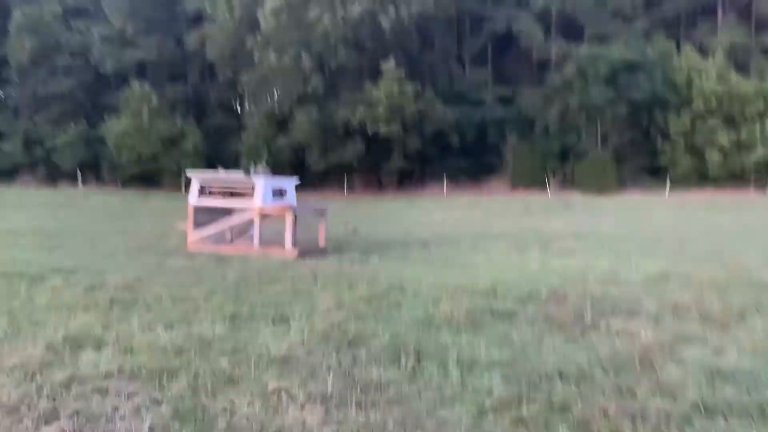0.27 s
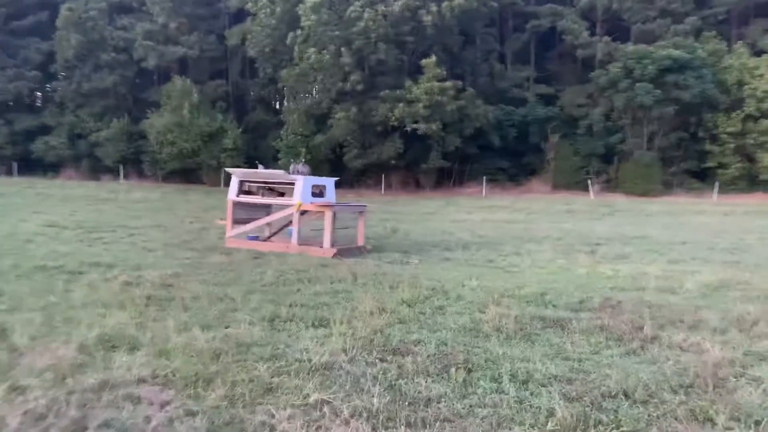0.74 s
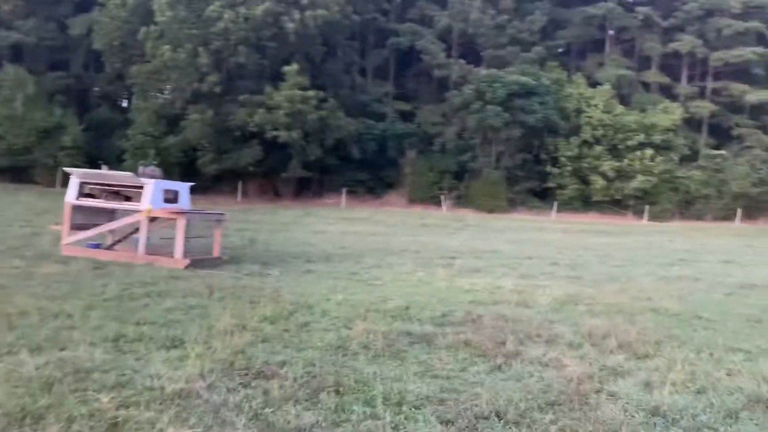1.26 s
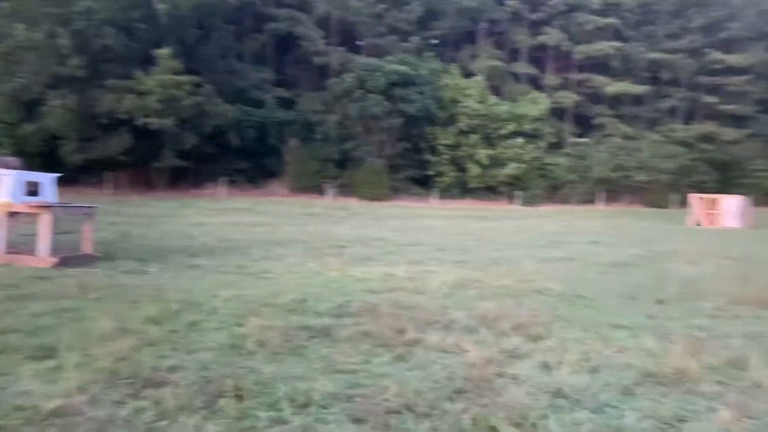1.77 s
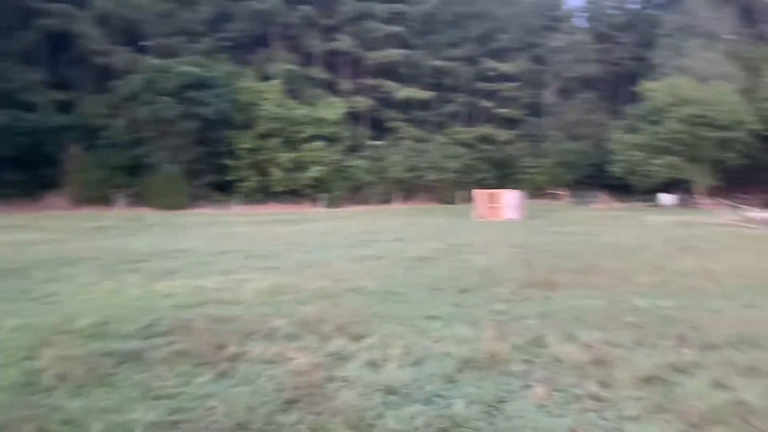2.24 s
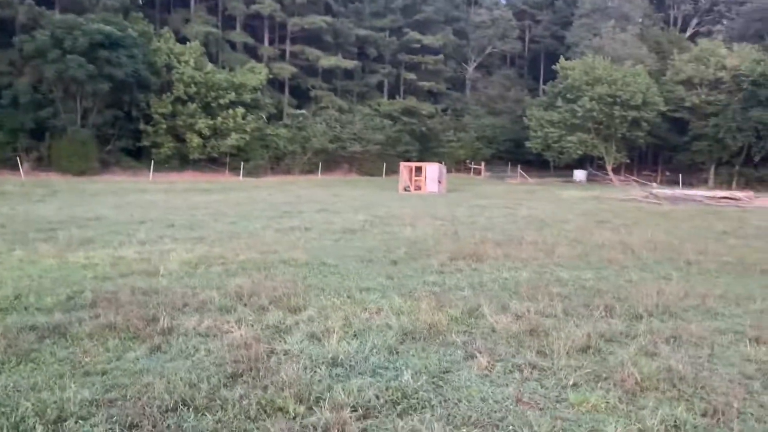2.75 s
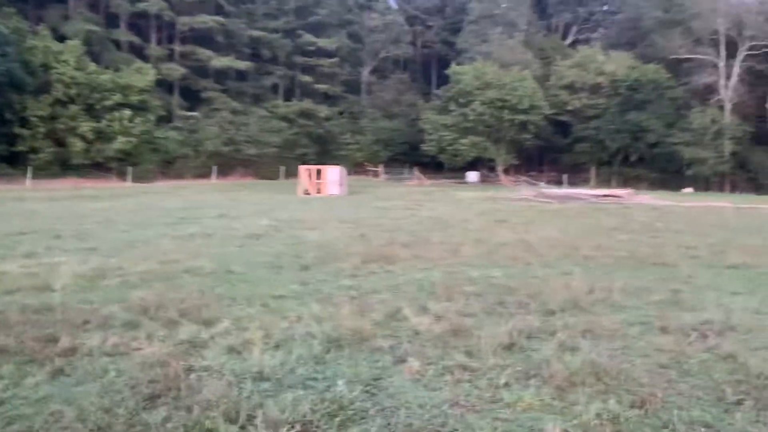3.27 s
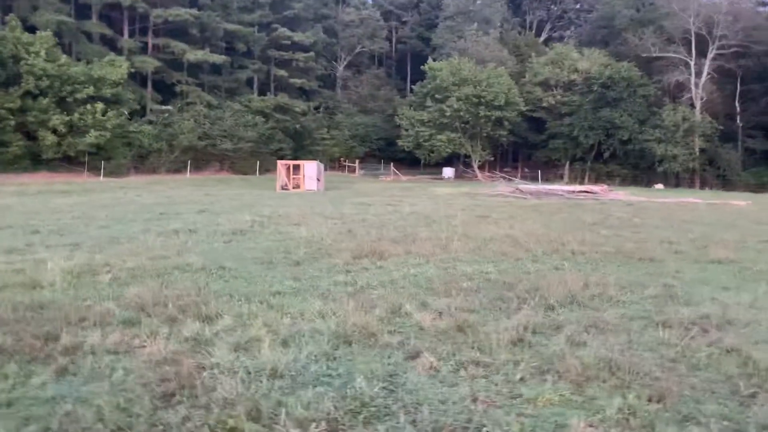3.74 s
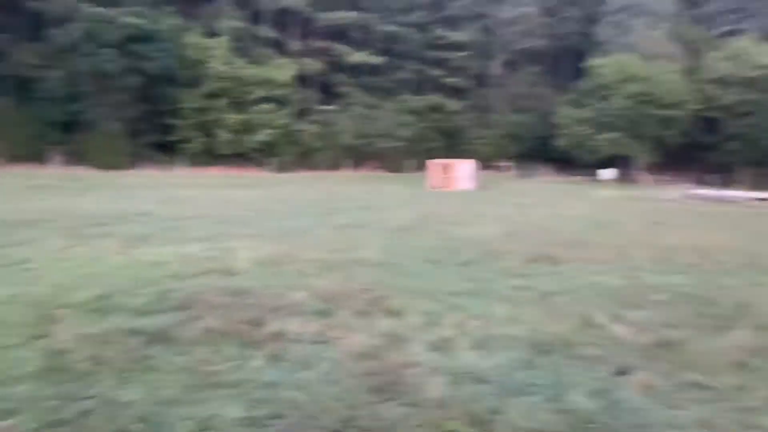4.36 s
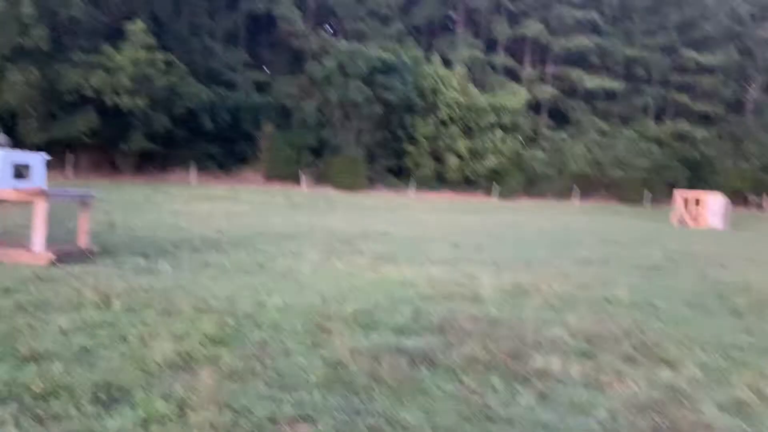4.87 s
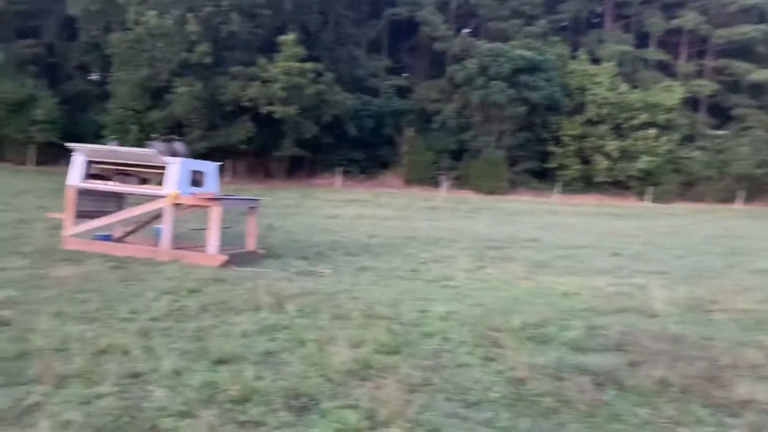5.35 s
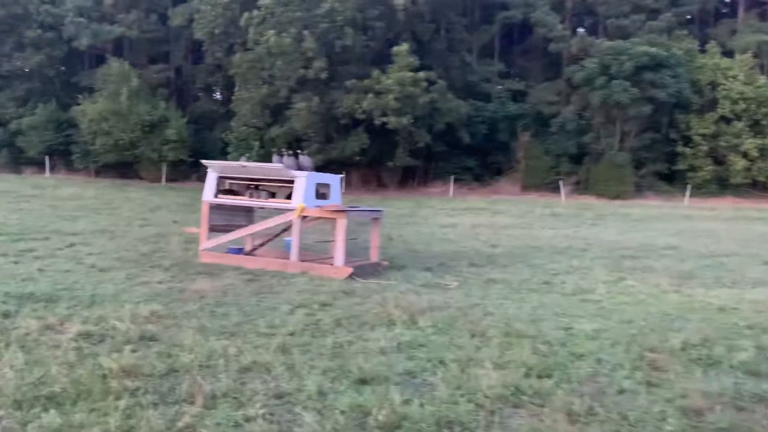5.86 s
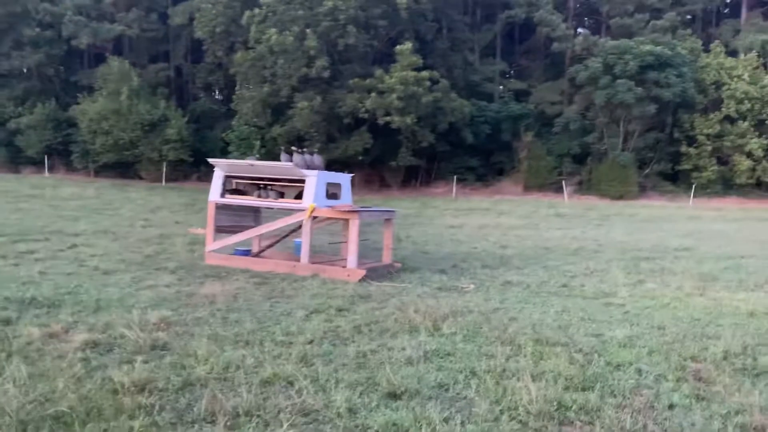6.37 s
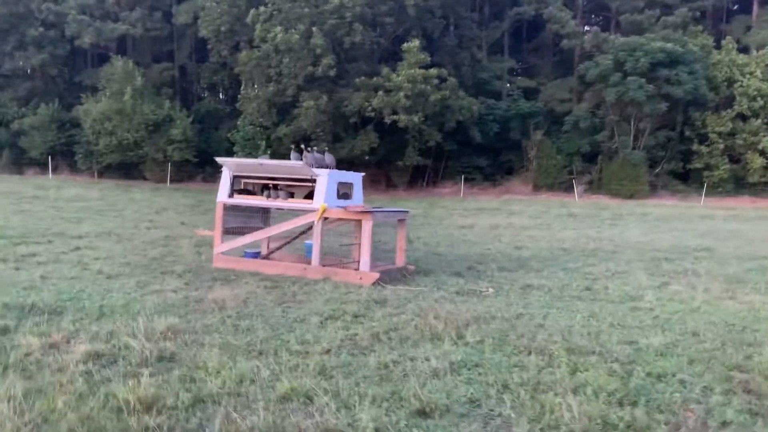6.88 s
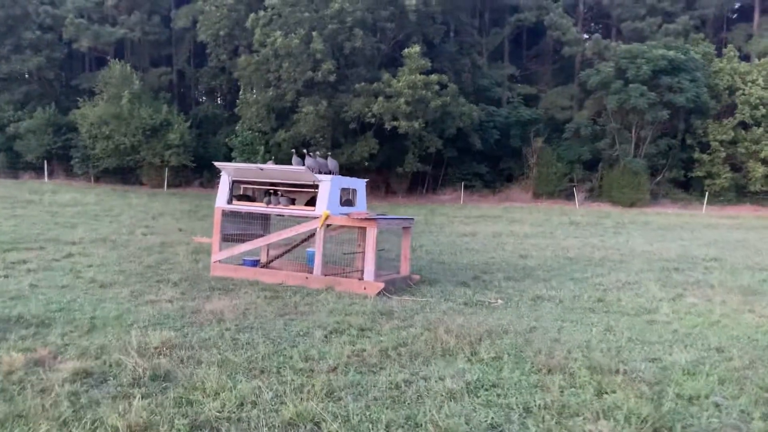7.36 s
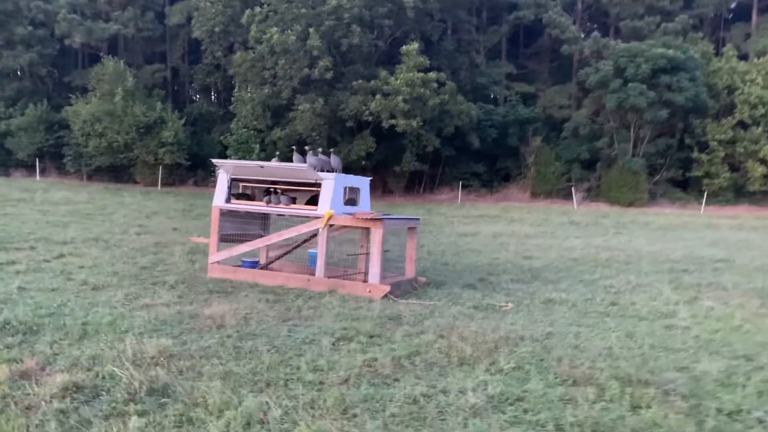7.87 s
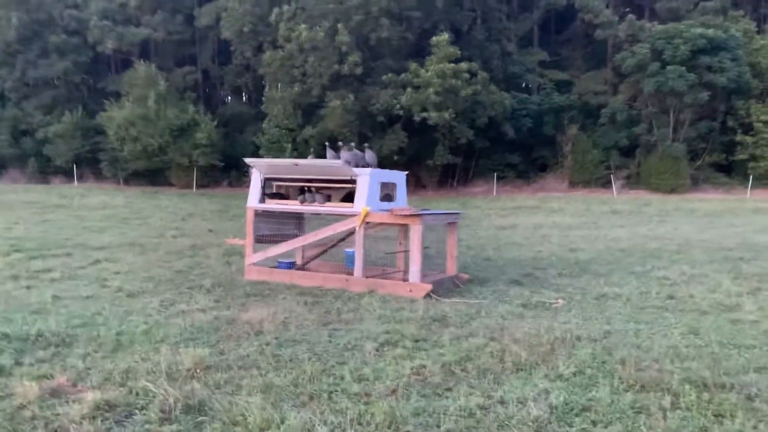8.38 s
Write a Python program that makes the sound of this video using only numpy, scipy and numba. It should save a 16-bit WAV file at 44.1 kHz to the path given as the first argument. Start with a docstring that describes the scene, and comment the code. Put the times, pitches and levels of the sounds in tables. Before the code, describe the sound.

Outdoors on a pasture beside woods, guinea fowl on a coop call in a steady rhythm: short cluck, then a longer rasping cry, roughly every 0.7 seconds. Clear piercing notes overlap the hoarse ones. The calls grow louder and closer toward the end. A handheld phone picks up grassy footsteps, a few stalk snaps, insect hiss and low rumble, with a faint echo from the trees.

```python
"""Guinea fowl on the roof of a coop call over a pasture: a short two-note cluck, then a long harsh cry, repeated.
Hoarse and clear voices overlap; each is a buzzing pulse train shaped by resonances of beak and throat.
Someone walks through the grass with a phone: steps are swells of crackling noise, snaps are noise bursts.
Filtered noise makes the air and the insects' hiss, a sine a far motor's hum; sines that glide make small
clicks, a soft coo and a faint warble."""
import sys
import numpy as np
from scipy import signal
from scipy.fft import rfft, irfft, next_fast_len
from scipy.io import wavfile
from scipy.ndimage import uniform_filter1d, map_coordinates
from numba import njit

SR = 44100
rng = np.random.default_rng(int(sys.argv[2]) if len(sys.argv) > 2 else 0)


def to_wav(sig):
    """Store sig (one row per channel, or 1-D mono) as 16-bit WAV at the path in sys.argv[1].

    Samples outside -1..1 are clipped; the rate is SR.
    """
    pcm = np.clip(np.atleast_2d(sig), -1, 1) * 32767
    pcm = np.round(pcm).astype(np.int16)
    wavfile.write(sys.argv[1], SR, pcm.T)  # frames by channels


N = 380141

# The grass's rustle, which the crunch of the steps follows.
# Each row: time in seconds, level in dB.
RUSTLE_LEVEL = [(.3, -63), (4.5, -61.5), (5.5, -58)]
ATTACK_S = .008  # every bird note starts abruptly


def undb(db):
    """Decibels to gain."""
    return 10 ** (np.asarray(db) / 20)


def unit(x):
    """Scale to rms 1."""
    return x / np.sqrt(np.mean(x ** 2))


def steady(x, size=1100):
    """Hold the running rms at 1 over a window of size samples."""
    return x / np.sqrt(uniform_filter1d(x * x, size) + 1e-12)


def along(x, points):
    """Read a curve of (position, value) points at x."""
    return np.interp(x, *np.transpose(points))


def bump(t, centre_s, width_s):
    """A smooth bell-shaped swell that peaks at 1."""
    return np.exp(-.5 * ((t - centre_s) / width_s) ** 2)


def sine(hz):
    """A sine that follows a moving frequency."""
    return np.sin(2 * np.pi * np.cumsum(hz) / SR)


def walk(n, rate):
    """Smooth chance: straight lines between normal draws, rate new values a second."""
    at = np.arange(n) * rate / SR
    knots = np.arange(int(at[-1]) + 2)
    return np.interp(at, knots, rng.standard_normal(len(knots)))


def colour(x, points):
    """Filter by a spectrum of (Hz, dB) points."""
    hz, db = np.transpose(points)
    n = x.shape[-1]
    size = next_fast_len(n)
    bin_hz = np.arange(size // 2 + 1) * SR / size
    gain = undb(np.interp(np.log(bin_hz + 1), np.log(hz), db))
    return irfft(rfft(x, size) * gain, size)[..., :n]


@njit
def svf(x, hz, width):
    """Band-pass with a moving centre, gain 1 there."""
    y, band, low = np.empty(len(x)), 0., 0.
    for i in range(len(x)):
        g, k = np.tan(np.pi * hz[i] / SR), width[i] / hz[i]
        v = (band + g * (x[i] - low)) / (1 + g * (g + k))
        band, low, y[i] = 2 * v - band, low + 2 * g * v, k * v
    return y


def resonance(x, hz, width_hz):
    """A resonance with steep skirts: two equal band-passes in a row."""
    hz, width = hz + np.zeros(len(x)), width_hz + np.zeros(len(x))
    return svf(svf(x, hz, width), hz, width)


def add(out, s, x):
    """Mix x in at time s."""
    i = max(int(s * SR), 0)
    out[i:i + len(x)] += x[:N - i]


def open_air():
    """Low rumble nearly alike in both ports and insect hiss from all round, both coloured noise."""
    # Spectrum of the open air's rumble and the insects' hiss.
    # Each row: frequency in Hz, relative density in dB.
    air_spectrum = [(22, -42), (42, -5), (78, 4.5), (170, -7.5), (480, -18.5), (1400, -17), (2200, -9),
                    (3000, -9), (4400, -8.5), (5700, -14), (6800, -7), (7500, -24), (9500, -38.5)]
    # Gain of the low rumble. Each row: time in seconds, gain in dB.
    rumble_gain = [(.8, 0.5), (3.7, 5), (4.7, 2.5)]
    mid = colour(rng.standard_normal(N), air_spectrum)
    side = colour(rng.standard_normal(N), air_spectrum)
    side = colour(side, [(130, -13), (500, 0), (1500, 0.5)])
    air = undb(-45.0) * unit(np.array([mid + side, mid - side]))
    rumble = colour(air, [(200, 1.5), (450, -58)])
    extra = undb(along(np.arange(N) / SR, rumble_gain)) - 1  # the air already holds the rumble once
    return air + rumble * extra


def insect_chorus():
    """One chorus, a narrow band of noise, swells while the phone faces it."""
    t = np.arange(N) / SR
    chorus = np.array([unit(resonance(rng.standard_normal(N), 2990, width_hz=400)) for _ in range(2)])
    return chorus * undb(-49.5) * bump(t, 3.35, 1.5)


def motor_hum():
    """A far motor: a sine at 120 Hz whose level and phase waver."""
    t = np.arange(N) / SR
    return undb(-54.5 + 2 * walk(N, 4.0)) * np.sin(2 * np.pi * 120 * t + .5 * walk(N, 15.0))


def rustle(uneven_db=3):
    """The grass rustles unevenly: a broad band of noise with slow and quick wavers in level."""
    level_db = along(np.arange(N) / SR, RUSTLE_LEVEL)
    level_db = level_db + uneven_db * (walk(N, 9.6) + walk(N, 45))
    return undb(level_db) * unit(resonance(rng.standard_normal(N), 785, width_hz=1440))


def warble(s=7.9, length=0.38, hz=2480, db=-52, swing_hz=120, rate_hz=14):
    """A faint, thin whistle far off: a sine whose pitch swings up and down."""
    out, t = np.zeros(N), np.arange(int(length * SR)) / SR
    swing = np.sin(2 * np.pi * rate_hz * t)
    size = undb(db + 2 * walk(len(t), 36)) * np.sqrt(np.hanning(len(t)))
    add(out, s, size * sine(hz + swing_hz * swing))
    return out


def coo(s=3.188, length=0.097, hz=298, db=-42):
    """One soft, pure, low note that arches slightly."""
    out, u = np.zeros(N), np.linspace(0, 1, int(length * SR))
    arch = np.sin(np.pi * u).clip(0)
    add(out, s, undb(db) * np.sqrt(arch) * sine(hz + 20 * (arch - .5)))
    return out


def hisses(half_s=0.033, hz=11300, width_hz=3200):
    """Short swells of very high noise."""
    # Brief high hisses. Each row: centre in seconds, peak level in dB.
    hiss_rows = [(2.11, -45), (2.95, -53), (5.61, -47.5), (6.92, -52.5)]
    t = np.arange(N) / SR
    swell = sum(undb(db) * bump(t, s, half_s) for s, db in hiss_rows)
    return swell * unit(np.array([resonance(rng.standard_normal(N), hz, width_hz) for _ in range(2)]))


def clicks(ring_s=0.0017):
    """Small wet clicks: a few cycles of a sine that fall quickly in pitch."""
    # Small wet clicks. Each row: start in seconds, level of the sine before it dies away in dB.
    click_rows = [(2.712, -24), (5.541, -30), (6.894, -27.5)]
    out, t = np.zeros(N), np.arange(SR // 50) / SR
    hz = 750 + 2200 * np.exp(-t / 0.00045)
    for s, db in click_rows:
        add(out, s, undb(db) * sine(hz) * bump(t, 0, ring_s))
    return out


def snaps(decay_s=0.0027, spread=0.99, bright_db=-24):
    """Stalks break underfoot: a few milliseconds of crackle each, pitched by the stalk's thickness."""
    # Dry stalks that snap. Each row: start in seconds, level in dB, centre in Hz.
    snap_rows = [(0.267, -38.5, 970), (0.489, -36, 2300), (.511, -32, 2500), (6.816, -43, 6000)]
    out, t = np.zeros(N), np.arange(SR // 25) / SR
    for s, db, hz in snap_rows:
        noise = rng.standard_normal(len(t))
        crack = unit(resonance(noise, hz, spread * hz)) + undb(bright_db) * noise
        add(out, s, undb(db) * crack * np.exp(-t / decay_s))
    return out


def footsteps(swish_s=0.075, crunch_db=61):
    """Each step bends many blades: a swell of fine crackle over a soft crunch that follows the rustle."""
    # Footsteps and legs brushing the grass.
    # Each row: centre in seconds, gain in dB on crackle and crunch.
    step_rows = [(.62, -51), (1.27, -57.5), (1.85, -54.5), (4.68, -53.5), (5.321, -55), (5.91, -52),
                 (6.55, -58.5), (7.17, -55.5), (7.42, -56.5), (7.82, -55.5), (8.2, -53.5), (8.5, -55.5)]
    t = np.arange(N) / SR
    swell = sum(undb(db) * bump(t, s, swish_s) for s, db in step_rows)
    # chance peaks in level turn the noise into crackle
    blades = rng.standard_normal((2, N)) * undb(2 * rng.exponential(size=N) + 2 * walk(N, 62))
    crackle = undb(4.0) * unit(colour(blades, [(3000, -25.0), (15000, 12.0)]))
    crunch = unit(colour(blades, [(250, -36.5), (1150, 1), (3000, -24.5)]))
    crunch = crunch * undb(crunch_db + along(t, RUSTLE_LEVEL))
    return swell * (crackle + crunch)


def tree_line(x, t60=0.3, wet_db=-17, early_s=0.031, early_width_s=0.006, early_db=6):
    """The edge of the wood scatters a faint noise tail back, with a cluster of early echoes."""
    t = np.arange(SR) / SR
    early = undb(early_db) * bump(t, early_s, early_width_s)
    tail = rng.standard_normal((2, SR)) * (np.exp(-np.log(1000) * t / t60) + early)
    return undb(wet_db) * signal.fftconvolve(x[None], unit(tail) / np.sqrt(SR), axes=1)[:, :N]


def at_ports(x):
    """Sound from the coop reaches the left port first and is a little louder on the right."""
    # The phone turns away from the birds and back.
    # Each row: time in seconds, lead of the left port in ms.
    bearing = [(.7, 0.054), (2.1, 0.36), (4.2, 0.43), (4.9, 0.24), (5.6, 0.12), (8.2, 0.044)]
    i = np.arange(N)
    lead = along(i / SR, bearing) * SR / 1000  # in samples
    return np.array([undb(4.5) * x, undb(6.0) * map_coordinates(x, [i - lead], order=3)])


def voice(rows, upper_hz=2300, upper_db=-8, release_s=0.013, jitter=0.0556, rasp=1.0, flutter=0.52,
          wander=0.2, surge_db=1.8, brighten=.3):
    """One note: the syrinx's pulses ring beak and throat; returns its start and its sound.

    Rows hold (s, pitch Hz, beak resonance Hz, beak dB, throat dB, roughness 0-1).
    """
    # The voice's weaker overtones. Each row: frequency in Hz, relative gain in dB.
    overtone_points = [(520, -3), (720, 29.5), (1400, 25), (2550, 27), (3200, 10), (4000, 24), (5150, 38),
                       (5800, 27), (8000, 22), (9900, 22.5), (12200, 20.5), (15500, 6)]
    # The calls' lower resonance follows the pitch; it sounds higher in the first, more distant calls,
    # where the ground reflects. Each row: time in seconds, multiple of the pitch.
    lower_resonance = [(2.9, 3.75), (3.5, 3.1), (6.0, 3.02)]
    s, *columns = np.transpose(rows)
    t = np.arange(s[0] - ATTACK_S / 2, s[-1] + release_s / 2, 1 / SR)
    hz, beak_hz, beak_db, throat_db, rough = (np.interp(t, s, c) for c in columns)
    n, rough = len(t), np.clip(rough, 0, 1)

    # the harder the syrinx is driven, the more the length of its cycles wanders
    phase = 2 * np.pi * np.cumsum(hz * (1 + jitter * rough * walk(n, 245.1))) / SR
    k = np.arange(1, 44)  # harmonics
    # the square term spreads each pulse out in time
    pulses = unit(np.cos(np.outer(phase, k) - .2 * k ** 2).sum(axis=1))
    # its other side starts to beat at a slower rate and fills in lines between the harmonics
    beating = 1 + flutter * rough * np.cos(0.49 * phase + walk(n, 65.4))
    breath = (1 + np.cos(phase)) * rng.standard_normal(n)  # escapes once a cycle
    buzz = pulses * beating + rasp * rough * breath

    # in a rasp the beak's resonance widens over several partials and the level surges
    surge = rough * walk(n, 163.5)
    moving_beak_hz = beak_hz * (1 + wander * rough * walk(n, 55.1))
    beak = steady(resonance(buzz, moving_beak_hz, width_hz=140 + 1150 * rough))
    beak = beak * undb(beak_db + surge_db * surge)
    throat = steady(resonance(buzz, hz * along(t, lower_resonance), width_hz=70 + 380 * rough))
    throat = throat * undb(throat_db + 6.2 * rough * walk(n, 42.7))
    # the rasp also rings an upper resonance
    upper = steady(resonance(buzz, upper_hz, width_hz=790)) * rough * undb(beak_db + upper_db)
    # overtones grow faster than the level: brighten is the extra dB for each dB of the beak
    overtone_db = beak_db - 27.5 + 24.9 * np.minimum(rough, .38) + brighten * (beak_db + 64)
    overtones = steady(colour(buzz, overtone_points)) * undb(overtone_db)
    # the fundamental only comes through when the pitch is pressed high
    fundamental = np.sin(phase) * undb(beak_db - 29.0 + 0.42 * (np.minimum(hz, 380) - 342.0))

    edges = np.minimum((t - t[0]) / ATTACK_S, (t[-1] - t) / release_s)
    gate = np.sin(np.pi / 2 * np.clip(edges, 0, 1)) ** 2
    return t[0], (beak + throat + upper + overtones + fundamental) * gate


def note(s, length, hz, fall_hz, beak_hz, db, throat_db, rough, shift_db, catch, edge_db=3):
    """A cluck's falling note, weaker and rougher at both ends, may start with a throat rasp; rows for voice."""
    u = np.linspace(0, 1, 7)  # share of the note gone by
    slack, early = (2 * u - 1) ** 2, np.clip(1 - 2 * u, 0, 1)
    level, shift = db - edge_db * slack, shift_db * early / 2  # half off the beak, half onto the throat
    pitch = hz - fall_hz * (u - .5)
    roughness = rough * (1 + slack) + catch * early
    return np.transpose(np.broadcast_arrays(
        s + u * length, pitch, beak_hz, level - shift, level + throat_db + shift, roughness))


def cluck(high_s, low_s, beak_hz, high_db, low_db, rasp=0.99):
    """A high falling note that catches with added roughness, and a low clean one; a list of rows for voice."""
    # The high note: middle pitch in Hz, throat over beak in dB, roughness 0-1, fall of the pitch in Hz,
    # length in seconds, shift from throat to beak in dB.
    high_note = (360, -11, 0.13, 20, .056, 16)
    # The low note: middle pitch in Hz, beak resonance in Hz, roughness 0-1, fall of the pitch in Hz,
    # length in seconds.
    low_note = (331, 1990, 0.07, 2, .046)
    # The low note grows fuller. Each row: time in seconds, throat over beak in dB.
    low_throat = [(3.4, -3), (6.0, 8.5)]
    high_hz, high_throat_db, high_rough, high_fall_hz, high_length, shift_db = high_note
    low_hz, low_beak_hz, low_rough, low_fall_hz, low_length = low_note
    high = note(high_s, high_length, high_hz, high_fall_hz, beak_hz, high_db, high_throat_db,
                high_rough, shift_db, rasp)
    low = note(low_s, low_length, low_hz, low_fall_hz, low_beak_hz, low_db, along(low_s, low_throat),
               low_rough, 0, 0)
    return [high, low]


def clear_note(s, length, from_hz, to_hz, db):
    """The beak is tuned to one partial of a clean voice and glides with it; returns rows for voice."""
    # The clean voice: usual pitch in Hz, throat over beak in dB, roughness 0-1.
    clear_voice = (350, -11, 0.11)
    # The higher a clear note rings, the faster it swells; low ones may fade.
    # Each row: end frequency in Hz, swell in dB per second.
    swell_rate = [(1200, -3), (2050, 81)]
    usual_hz, throat_db, rough = clear_voice
    swell_db = length * along(to_hz, swell_rate)
    partial = np.round((from_hz + to_hz) / 2 / usual_hz)
    ends = [(s, from_hz, db - swell_db), (s + length, to_hz, db)]
    return [(at, hz / partial, hz, level, level + throat_db, rough) for at, hz, level in ends]


def cry(s, length, top_hz, from_hz, to_hz, db, swell_db, throat_db, rough, slack=0.28):
    """The pitch arches and the rasp with it, the beak opens, the level swells and sags; rows for voice."""
    start_hz, end_hz = 341.7, 321.5  # slack pitch that every cry arches from and back to
    crest, peak_place = 0.58, 0.63  # where pitch and level peak, share of the cry
    sag_db, throat_fade_db = 6, 13  # fall after the peak; throat's fall per cry length from the middle
    scoop_s, scoop_hz, scoop_db = 0.01103, 24.43, 4  # a cleaner, accented chirp up from below the pitch
    opening = 0.93  # power of the share gone by: the beak opens fast at first
    u = np.linspace(0, 1, 61)  # share of the cry gone by
    arch = np.sin(np.pi / 2 * np.interp(u, [0, crest, 1], [0, 1, 2]))
    slack_hz = start_hz + (end_hz - start_hz) * u
    hz = slack_hz + (top_hz - slack_hz) * arch
    beak_hz = from_hz + (to_hz - from_hz) * u ** opening
    beak_db = db - np.interp(u, [0, peak_place, 1], [swell_db, 0, sag_db])
    throat_db = throat_db - throat_fade_db * abs(u - .5)
    scoop = np.exp(-(u * length / scoop_s) ** 2)
    rough = rough * (1 + slack * (arch - 2 / np.pi)) * (1 - scoop / 2)
    beak_hz = beak_hz * (1 - scoop_hz * scoop / hz / 2)
    return np.transpose([s + u * length, hz - scoop_hz * scoop, beak_hz,
                         beak_db + scoop_db * scoop, throat_db, rough])


def guinea_fowl():
    """All hoarse cries, clear notes and two-note clucks, each sung by a pulsing syrinx."""
    # Long hoarse cries. Each row: start in seconds, length in seconds, top pitch in Hz,
    # beak resonance at the start in Hz, at the end in Hz, peak beak level in dB before the ports,
    # swell up to it in dB, throat level in mid-cry in dB before the ports, mean roughness 0-1.
    cry_rows = [(0.6, 0.18, 347, 1490, 2170, -43, 4, -50, 0.42),
                (1.36, 0.18, 357, 1570, 1950, -43, 2.5, -48, 0.43),
                (2.041, 0.19, 339.5, 1700, 2380, -44, 3, -39.5, 0.44),
                (2.729, 0.2, 369, 1850, 2110, -45.5, 1, -48, 0.49),
                (3.455, 0.23, 368, 1700, 1820, -41, 5.5, -55, 0.5),
                (4.131, 0.22, 376.4, 1680, 2030, -41, 8, -51, 0.53),
                (4.819, 0.23, 368.6, 1620, 1820, -39.5, 5, -56, 0.59),
                (5.498, 0.22, 364, 1620, 1800, -38.5, 7, -50.5, 0.47),
                (6.165, .207, 360.8, 1720, 1800, -37.5, 9, -50.5, 0.5),
                (6.848, 0.17, 351.5, 1770, 2030, -41.5, -0.5, -54, 0.27),
                (7.502, 0.18, 380, 1570, 1840, -37.5, 5.5, -51, 0.35),
                (7.757, 0.18, 374.3, 1510, 2120, -46.5, 1.5, -55.5, 0.57),
                (8.146, 0.152, 380, 1600, 1980, -38, 5, -53, 0.33)]
    # Clear notes that ring through the hoarse ones. Each row: start in seconds, length in seconds,
    # strongest partial at the start in Hz, at the end in Hz, beak level at the end in dB before the ports.
    clear_rows = [(0.505, 0.019, 1335, 1510, -47), (0.752, 0.014, 2090, 2090, -40.5),
                  (2.101, 0.064, 2030, 2040, -36), (2.898, 0.065, 1700, 1730, -43.5),
                  (2.917, 0.12, 2000, 2050, -35), (3.574, 0.031, 1590, 1610, -44),
                  (3.56, 0.101, 1833, 1857, -41), (4.225, 0.1, 1790, 1895, -39),
                  (4.923, 0.095, 1760, 1830, -37), (5.535, 0.043, 1750, 1695, -38.5),
                  (5.555, 0.065, 985, 1040, -48.5), (5.608, 0.062, 1831, 1865, -38),
                  (6.222, 0.071, 1000, 1052, -45), (6.31, 0.027, 1695, 1734, -38),
                  (6.861, 0.121, 1030, 1025, -44.5), (6.904, 0.094, 2100, 2055, -34.5),
                  (7.503, 0.051, 1700, 1780, -38.5), (7.618, 0.048, 2060, 2028, -39),
                  (8.125, 0.015, 1402, 1590, -38), (8.152, 0.025, 1060, 1040, -41.5),
                  (8.188, 0.1, 1830, 1945, -37)]
    # Two-note clucks ahead of the cries. Each row: start of the high note in seconds, of the low note
    # in seconds, beak resonance of the high note in Hz, base level of the high note in dB before the ports,
    # of the low note in dB before the ports.
    cluck_rows = [(0.469, .47, 1480, -61, -52.5), (1.213, 1.21, 1425, -47, -52),
                  (1.917, 1.865, 1370, -43.5, -51), (2.585, 2.53, 1840, -48.5, -63),
                  (3.3, 3.371, 1680, -47, -49), (3.987, 4.04, 1720, -44.5, -47.5),
                  (4.665, 4.728, 1760, -41.5, -51), (5.352, 5.393, 1790, -41, -53.5),
                  (6.017, 6.054, 1770, -42, -52.5), (6.698, 6.684, 1720, -41, -52),
                  (7.382, 7.335, 1430, -51.5, -49), (8.081, 7.985, 1340, -64, -47.5)]
    out = np.zeros(N)
    for row in cry_rows:
        add(out, *voice(cry(*row)))
    for row in clear_rows:
        add(out, *voice(clear_note(*row)))
    for row in cluck_rows:
        for rows in cluck(*row):
            add(out, *voice(rows))
    return out


def scene():
    """Pasture, small sounds, walker, wood's edge and birds."""
    pasture = open_air() + insect_chorus() + motor_hum() + rustle()
    small_sounds = coo() + hisses() + clicks()
    walker = footsteps() + snaps()
    birds = guinea_fowl()
    return pasture + small_sounds + walker + tree_line(birds) + at_ports(birds + warble())


def record(dry):
    """The phone cuts the top with a steep low-pass at 15.8 kHz."""
    return signal.sosfilt(signal.ellip(10, .2, 70, 15800, fs=SR, output="sos"), dry)


dry = scene()
out = record(dry)
to_wav(out)
```